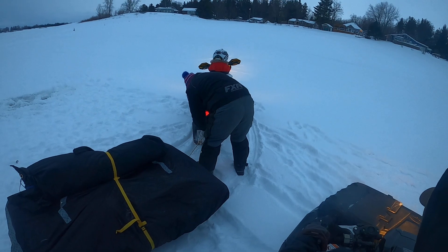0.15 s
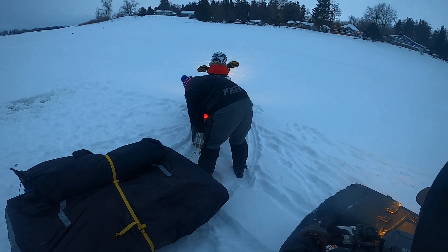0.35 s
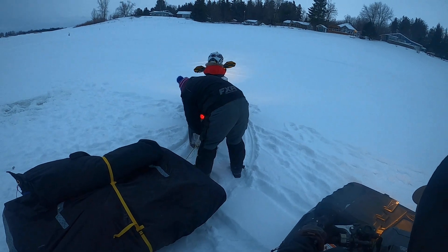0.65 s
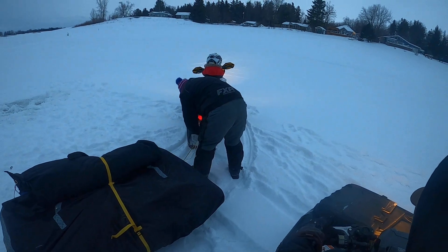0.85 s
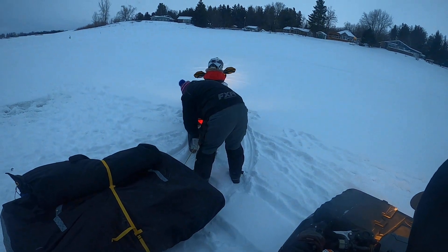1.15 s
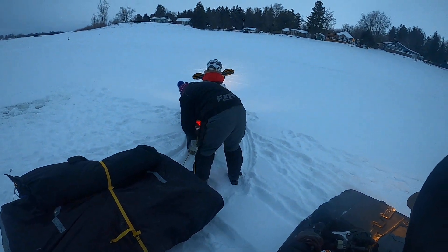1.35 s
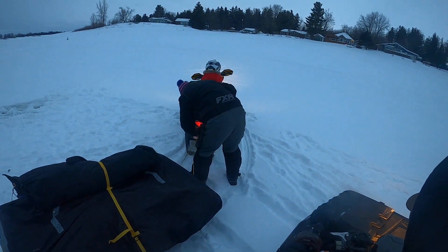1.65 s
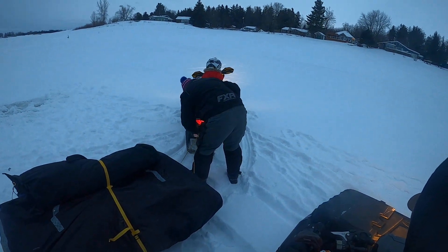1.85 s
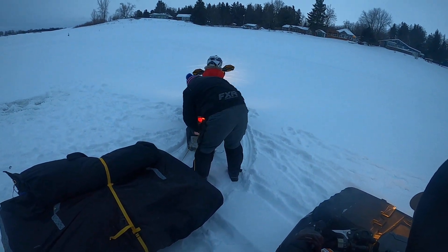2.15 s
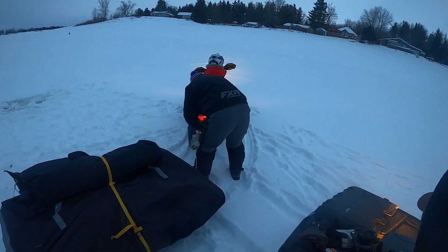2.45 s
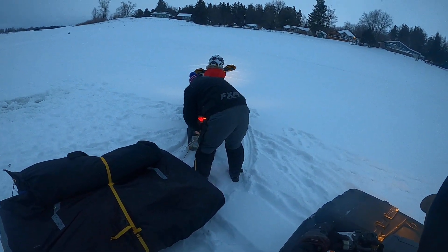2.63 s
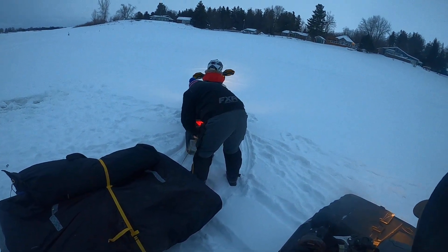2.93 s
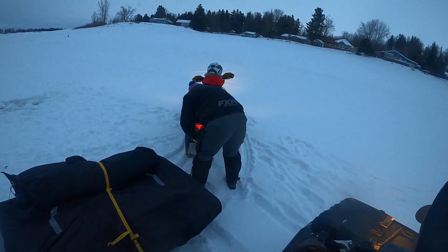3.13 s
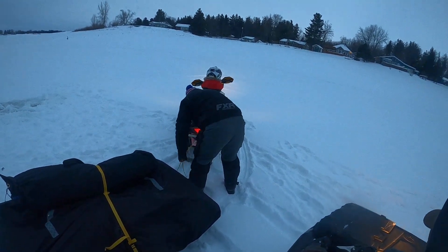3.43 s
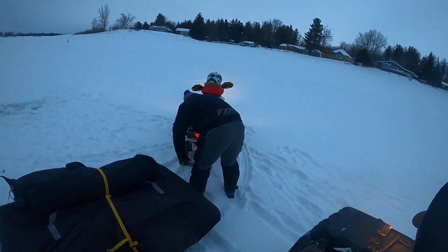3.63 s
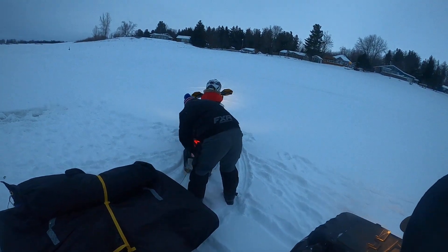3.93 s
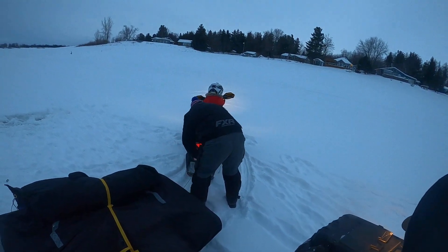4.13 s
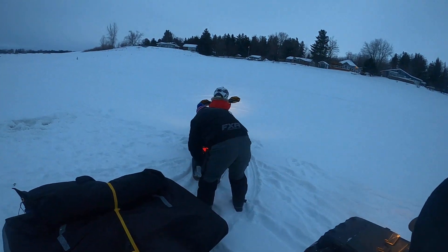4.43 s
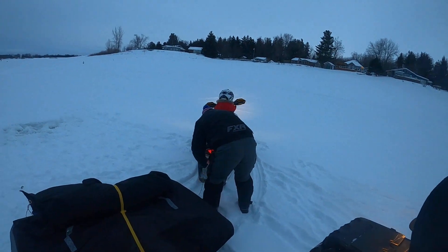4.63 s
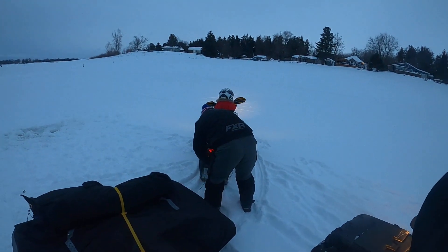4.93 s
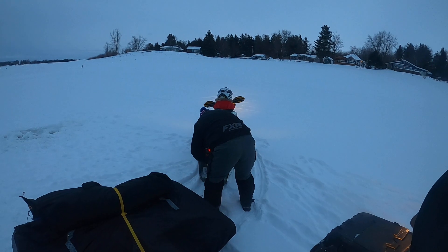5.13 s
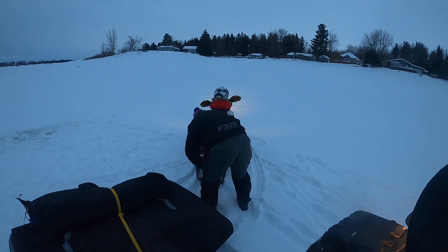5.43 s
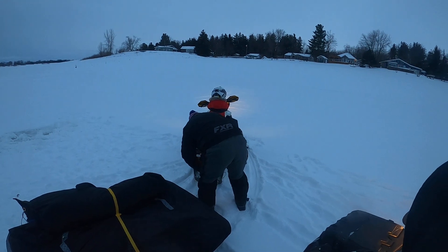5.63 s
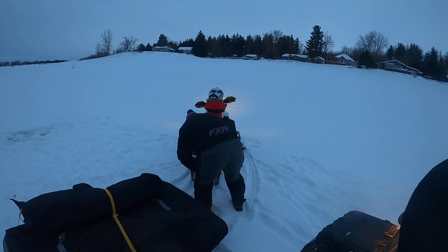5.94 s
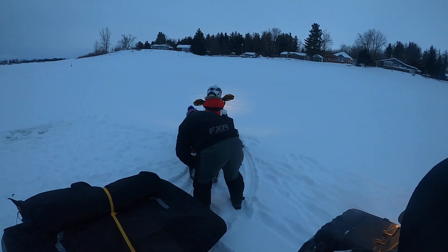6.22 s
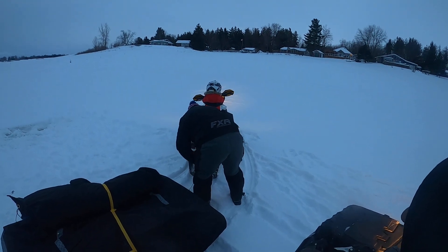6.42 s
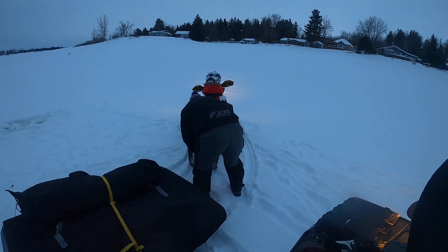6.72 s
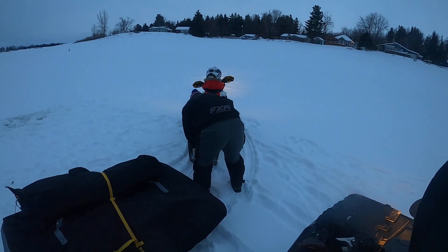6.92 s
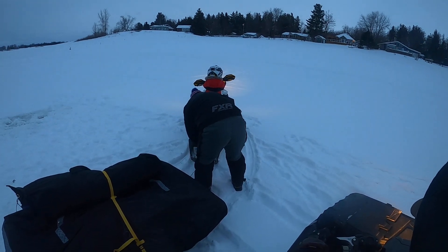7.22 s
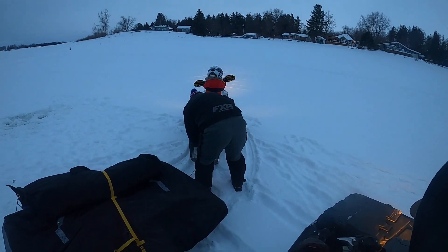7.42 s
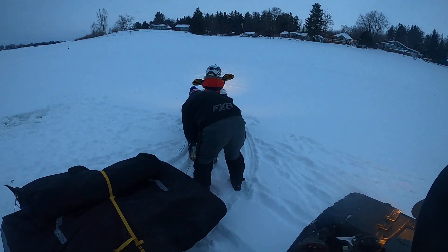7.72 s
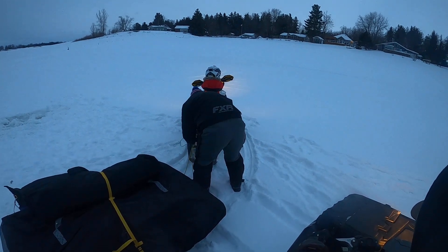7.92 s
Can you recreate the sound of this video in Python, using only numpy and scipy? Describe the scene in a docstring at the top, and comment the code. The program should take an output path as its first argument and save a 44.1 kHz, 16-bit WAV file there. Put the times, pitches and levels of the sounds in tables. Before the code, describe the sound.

A lumpy snowmobile engine chugs steadily outdoors, dry and without echo. For nearly three seconds, plastic buzz and irregular clatter sit right, with bright mechanical whirr left. Scraping and sharp knocks follow around 2.8 and 3.35 seconds, each with a low dying thump. Afterwards the rattle mostly disappears, leaving thuds, soft gas puffs and valve chatter; drone and faint buzz grow late. The microphone is close, on the seat.

```python
"""Open snow, no walls, no echo: a four-stroke twin snowmobile idles, heard from the seat.
Filtered impulses make two uneven exhaust thuds a cycle; noise puffs make gas, panels and ticking valves.
Gears whirr as coloured noise. A loose camera mount buzzes and clacks (resonated impacts) at the right port,
scrapes into two groups of knocks (ringing modes), then seats, bringing the sound to the middle.
Later it creeps a little loose again."""
import sys
import numpy as np
from scipy import signal
from scipy.fft import rfft, irfft
from scipy.io import wavfile
from scipy.ndimage import uniform_filter1d

SR = 44100
rng = np.random.default_rng(int(sys.argv[2]) if len(sys.argv) > 2 else 0)


def dump_mix(stems):
    """Bounce the given channels to the path in sys.argv[1] as a 16-bit WAV at rate SR."""
    frames = np.atleast_2d(stems).T  # one column per channel
    limited = np.clip(frames, -1, 1)  # hard clip at full scale
    pcm = np.round(limited * 32767).astype(np.int16)
    wavfile.write(sys.argv[1], SR, pcm)


N = 355887

CYCLE_HZ, FIRST_FIRING_S = 10.34, .029


def undb(db):
    """Decibels to gain."""
    return 10 ** (np.asarray(db) / 20)


def unit(x):
    """Scale to rms 1."""
    return x / np.sqrt(np.mean(x ** 2))


def ports(left_db):
    """Left and right gains, with the right at 1."""
    return undb(np.array([[left_db], [0]]))


def ramp(start_s, length_s):
    """Even rise from 0 to 1."""
    return np.clip((np.arange(N) / SR - start_s) / length_s, 0, 1)


def arch(middle_s, length_s):
    """Smooth rise from 0 to 1 and back."""
    return np.sin(np.pi * ramp(middle_s - length_s / 2, length_s)) ** 2


def swells(rows):
    """Gain that rests at 1 and rises or dips for each swell."""
    return undb(sum(db * arch(s, length) for s, length, db in rows))


def walk(rate):
    """Smooth random wander, rms 1, with a new target at the given rate in Hz."""
    k = int(SR / rate)
    targets = rng.standard_normal(N // k + 1)
    return unit(uniform_filter1d(np.repeat(targets, k), k)[:N])


def add(out, s, sound):
    """Mix a sound in at a time in seconds."""
    at = int(s * SR)
    out[:, at:at + sound.shape[-1]] += sound[..., :N - at]


def colour(x, points):
    """Causal minimum-phase filter through (f/Hz, level/dB) points, falling off beyond both ends."""
    hz, db = np.transpose(points)
    size = 16384
    log_f = np.log(np.maximum(np.arange(size // 2 + 1) * SR / size, 1))
    skirts = np.maximum(log_f - np.log(hz[-1]), 0) + np.maximum(np.log(hz[0]) - log_f, 0)
    log_gain = np.log(undb(np.interp(log_f, np.log(hz), db))) - 2 * skirts
    # folding the cepstrum onto positive time makes the filter causal
    cepstrum = irfft(log_gain)
    cepstrum[1:size // 2] *= 2
    cepstrum[size // 2 + 1:] = 0
    response = irfft(np.exp(rfft(cepstrum)))
    return signal.fftconvolve(x, response)[:len(x)]


def resonate(x, hz, width):
    """Steep resonance whose centre may move: shift to 0 Hz, low-pass in two stages, shift back."""
    turn = np.exp(2j * np.pi * np.cumsum(hz * np.ones(N)) / SR)
    pole = np.exp(-2 * np.pi * width / SR)
    smoothed = signal.lfilter([(1 - pole) ** 2], np.poly([pole, pole]), x * turn.conj())
    return 2 * np.real(turn * smoothed)


def strokes(parts, scatter_db, jitter_s):
    """One impulse per part and engine cycle, each a little different in time and strength."""
    out, cycles = np.zeros(N), np.arange(-1, N / SR * CYCLE_HZ)
    for place, db in parts:
        chance = rng.standard_normal((len(cycles), 2))
        times = FIRST_FIRING_S + (cycles + place) / CYCLE_HZ + jitter_s * chance[:, 0]
        at = (times * SR).astype(int)
        inside = (at >= 0) & (at < N)
        out[at[inside]] += undb(db + scatter_db * chance[inside, 1])
    return out


def bursts(hits, decay_s):
    """Each impulse sets off a dying puff of noise."""
    envelope = signal.lfilter([1], [1, -np.exp(-1 / (decay_s * SR))], hits)
    return unit(envelope * rng.standard_normal(N))


def rattle(rate, spread_db):
    """Dense random impacts of different sizes, rate per second."""
    size = undb(spread_db * rng.uniform(-0.4, 1, N)) * rng.choice([-1, 1], N)
    return unit((rng.random(N) < rate / SR) * size)


def snap(spectrum, decay_s):
    """A very short burst of contact noise, peak 1."""
    t = np.arange(SR // 2) / SR
    burst = colour(rng.standard_normal(len(t)) * np.exp(-t / decay_s), spectrum)
    return burst / np.abs(burst).max()


# valves closing: place in the cycle [0-1], level/dB
VALVE_CLOSINGS = [(.24, -1), (.42, -1.5), (.64, 1.5), (.79, 1.5)]


def valve_strokes():
    """Valves meet their seats in each cycle, slightly unevenly."""
    return strokes(VALVE_CLOSINGS, scatter_db=1.5, jitter_s=.001)


def machinery(valves, valve_db, chain_db):
    """Valve taps and chain chatter over the even whirr of the gears."""
    taps = undb(valve_db) * bursts(valves, decay_s=0.005)
    chain = undb(chain_db) * rattle(rate=670, spread_db=9.0)
    gears = rng.standard_normal(N) * undb(.7 * walk(14))
    return unit(taps + chain + gears)


# thin airy hiss: f/Hz, level/dB
AIR_SPECTRUM = [(300, 9), (600, 1.5), (1100, -1.5), (1600, 3), (2100, -17), (2700, -10.5), (3130, 5),
                (3330, -9.5), (3900, -9.5), (5100, -18), (5900, -19), (7300, -24.5), (8600, -43.5)]
# its swells: middle t/s, length t/s, rise level/dB
HISS_RISES = [(3.45, 0.3, 11), (4.75, 1.1, 8), (7.6, 4.5, 14)]


def hiss(valves):
    """Machinery noise thinned to air, swelling now and then."""
    air = unit(colour(machinery(valves, valve_db=-3.5, chain_db=-11.5), AIR_SPECTRUM))
    return undb(-70) * swells(HISS_RISES) * air


# gas spitting from the pipe: f/Hz, level/dB
GAS_SPECTRUM = [(2500, -4), (4000, 2.5), (5500, -4.5), (7500, -8.5), (9000, -11.5), (13000, -18.5)]


def spit(firings, swell_s):
    """A soft puff of gas swells and dies with each firing."""
    t = np.arange(SR // 10) / SR
    puffs = signal.fftconvolve(firings, t * np.exp(-t / swell_s))[:N]
    return undb(-84.5) * unit(colour(puffs * rng.standard_normal(N), GAS_SPECTRUM))


# the clutch's chinks: place in the cycle [0-1], level/dB
CLUTCH_CHINKS = [(.62, -1), (.8, -1), (.22, -3)]


def clutch():
    """Slack in the clutch chinks with the crank's jerks, now faint, now clear."""
    chinks = bursts(strokes(CLUTCH_CHINKS, scatter_db=2.2, jitter_s=.003), decay_s=.009)
    ring = resonate(chinks, 1560 * (1 + .04 * walk(15)), width=190)
    return undb(-63) * unit(ring)


# the hood's two modes: f/Hz, width f/Hz, level/dB
HOOD_MODES = [(328.5, 21, 1), (348.4, 14, -0.5)]
# swells of the drone: middle t/s, length t/s, rise level/dB
DRONE_RISES = [(5.55, 0.52, 2.5), (6.9, 1, 3.5), (7.7, 0.94, 7.5)]


def hood(firings):
    """The hood drones in two close, wandering modes, driven by noise and by the firings."""
    drive = unit(firings) + undb(13.0) * rng.standard_normal(N)
    drone = 0
    for hz, width, db in HOOD_MODES:
        drone = drone + undb(db) * resonate(drive, hz * (1 + 0.0059 * walk(3)), width)
    return undb(-50) * swells(DRONE_RISES) * unit(drone)


# engine block and gears: f/Hz, level/dB
BLOCK_SPECTRUM = [(250, -4.5), (450, -1.5), (620, -2), (880, -7), (1050, -3), (1170, -7.5), (1380, 0),
                  (1600, 0.5), (1800, -2.5), (2070, -14), (2320, -11), (2500, -13.5), (2800, -9),
                  (3100, -15.5), (3400, -19), (5000, -45)]


def engine_block(valves):
    """Valves, chain and gears sound through the resonant block."""
    works = machinery(valves, valve_db=-11.0, chain_db=-4.5)
    return undb(-56) * unit(colour(works, BLOCK_SPECTRUM))


# rubbing fabric: f/Hz, level/dB
CLOTH_SPECTRUM = [(300, -5.5), (800, 15), (1050, 2.5), (1350, 2.5), (1900, -9), (2500, -11), (3400, -28),
                  (4200, -36.5), (5000, -31.5), (6000, -58.5), (8000, -57)]
# clothing brushing the camera: middle t/s, length t/s, level/dB, left minus right level/dB
BRUSH_STROKES = [(2.76, 0.073, -46, -21), (2.934, 0.36, -51, -18.5), (3.222, 0.16, -47.5, 1.5)]


def brush():
    """Stiff fabric catches and slips on the camera: uneven grains under a few arched strokes."""
    grains = rattle(rate=1200, spread_db=6) * undb(2 * walk(60))
    pressure = 0
    for s, length, db, pan_db in BRUSH_STROKES:
        sides = undb(db + np.array([[pan_db], [-pan_db]]) / 2)
        pressure = pressure + arch(s, length) * sides
    return pressure * unit(colour(grains, CLOTH_SPECTRUM))


def mount_play(settle_power, creep_power):
    """How loose the mount is (near 1 = loose): free, then seated, then slowly working loose again."""
    seated_play, creep_play = 0.014, 0.19
    settling = (1 - ramp(2.776, length_s=1)) ** settle_power
    creep = ramp(5.2, length_s=3.17) ** creep_power
    return seated_play + settling + creep_play * creep


# bright side of the whirr, at the left port: f/Hz, level/dB
BRIGHT_SPECTRUM = [(400, -10), (1000, -6.5), (1330, -4.5), (1500, 8), (1610, -10.5), (1730, 2.5),
                   (2070, -14), (2350, 0), (2600, -8.5), (3120, -1.5), (3290, -13), (3800, -12),
                   (4600, -23), (7400, -24.5), (8600, -42.5)]


def bright_whirr(valves):
    """Machinery noise with the bright colour of the left port; level at a play of 1."""
    works = machinery(valves, valve_db=-4.0, chain_db=-4.5)
    return undb(-51.5) * unit(colour(works, BRIGHT_SPECTRUM))


def housing(valves, resonances, impact_db, drift):
    """Engine vibration chatters through the loose mount and excites drifting resonances."""
    impacts = undb(impact_db) * rattle(rate=300, spread_db=3.0)
    chatter = impacts + machinery(valves, valve_db=-9.0, chain_db=-18.0)
    ring = 0
    for hz, width, db in resonances:
        ring = ring + undb(db) * resonate(chatter, hz * (1 + drift * walk(4)), width)
    return unit(ring)


# resonances of the steadier rattle in its shell: f/Hz, width f/Hz, level/dB
SHELL_MODES = [(137, 22.5, 12.5), (154, 29, 11), (343.2, 7, 16), (774, 83, -4), (950, 16, -6.5),
               (1032, 59, 2.5), (1155, 160, -7)]


def shell_rattle(valves):
    """The shell rattles more steadily than the housing buzzes; level at a play of 1."""
    return undb(-36) * housing(valves, SHELL_MODES, impact_db=-2.0, drift=0.0065)


# one clack of the housing: f/Hz, level/dB
CLACK_SPECTRUM = [(300, -22), (450, -6), (550, 0), (680, -2), (820, -20), (1050, -22), (1600, -38),
                  (3000, -58)]
# the housing's bounces on the mount: place in the cycle [0-1], level/dB
HOUSING_BOUNCES = [(0, 1), (.17, -1.5), (.43, 0.5), (.83, -3)]


def clatter():
    """The loose housing bounces against the mount in step with the engine, very unevenly."""
    bounces = strokes(HOUSING_BOUNCES, scatter_db=4, jitter_s=.003)
    return undb(-51) * unit(colour(bursts(bounces, decay_s=0.0022), CLACK_SPECTRUM))


# low resonances of the buzzing camera housing: f/Hz, width f/Hz, level/dB
HOUSING_MODES = [(234, 20, -6.5), (463.3, 35, 7.5), (534.7, 29, 9), (621.5, 23, 7), (644.5, 31, -0.5),
                 (730, 42, -9.5)]
# surges and dips of the buzz: middle t/s, length t/s, rise level/dB
BUZZ_SURGES = [(.33, 0.34, 3.5), (.54, 0.71, 2), (1.09, 0.43, 4), (1.56, 0.41, -6), (1.85, 0.12, 4),
               (2.33, 0.72, 2), (2.53, 0.15, 4.5), (2.785, 0.11, 14.5), (3.05, 0.57, 5.5), (7.85, 2.7, 3.5)]


def housing_buzz(valves):
    """Buzz and clatter surge together; the pitches wander as the housing shifts in the mount."""
    buzz = undb(-38) * housing(valves, HOUSING_MODES, impact_db=1.5, drift=.015)
    return swells(BUZZ_SURGES) * (buzz + clatter())


# the hardest rattles of the housing: start t/s, length t/s, level/dB at a play of 1
CLACK_RUNS = [(.293, .025, -29), (.355, .025, -33), (.432, .018, -34), (.985, .03, -31), (1.08, .018, -29),
              (1.168, .018, -30), (1.361, .04, -39), (1.94, .062, -33), (2.114, .01, -33),
              (2.19, .018, -32), (2.275, .02, -30), (2.356, .028, -30), (2.41, .02, -36), (2.9, .014, -33),
              (2.922, .03, -32), (3.002, .02, -34), (7.882, .012, -32)]


def clacks(attack_s, release_s):
    """Now and then the housing breaks into a short, harder rattle of shaped noise."""
    out, t = np.zeros((1, N)), np.arange(SR // 5) / SR
    for s, length_s, db in CLACK_RUNS:
        envelope = np.minimum(t / attack_s, 1) * np.exp(-np.maximum(t - length_s, 0) / release_s)
        run = colour(envelope * rng.standard_normal(len(t)), CLACK_SPECTRUM)
        # the run's whole energy is set by its level and length
        add(out, s, undb(db) * run * np.sqrt(length_s * SR / np.sum(run ** 2)))
    return out[0]


# buzz and rattle leaking to the left port: f/Hz, level/dB
LEAK_SPECTRUM = [(130, -15.5), (250, -9), (345, -8), (450, -23.5), (650, -35), (1020, -23.5), (1400, -16)]
# the bright whirr at the right port, relative to the left: f/Hz, level/dB
RIGHT_SPECTRUM = [(900, -13.5), (1300, -4), (1520, 4), (1750, -3), (2330, -4), (2800, -9.5), (3700, -6.5),
                  (5500, -9.5)]


def cross_ports(bright, loose):
    """Brightness sits left and buzz right; each is filtered on its way to the other port."""
    left = bright + colour(loose, LEAK_SPECTRUM)
    # the whirr reaches the right port 0.1 ms earlier
    lead = int(.0001 * SR)
    right = loose + np.roll(colour(bright, RIGHT_SPECTRUM), -lead)
    return np.array([left, right])


# plastic sliding on plastic: f/Hz, level/dB
SCRAPE_SPECTRUM = [(700, -10), (1100, -18), (1400, 8), (1750, -4), (2050, -13), (2300, -2.5), (2750, -17.5),
                   (3300, -16.5), (4100, -33.5), (5300, -27), (7000, -51)]
# scrapes into a knock: end t/s, length t/s, judder f/Hz, judder level/dB, its left minus right level/dB,
# grit level/dB, its left minus right level/dB
MOUNT_SCRAPES = [(2.789, 0.043, 693, -25.5, -26, -40.5, 2), (3.352, .028, 410, -22.5, 1.5, -38.5, 4)]


def scrapes(waver, release_s):
    """The mount judders (a wavering tone) and grates (dense impacts), ever louder, into a knock."""
    grit = unit(colour(rattle(rate=2500, spread_db=4.5), SCRAPE_SPECTRUM))
    out = np.zeros((2, N))
    for end_s, length_s, hz, judder_db, judder_left_db, grit_db, grit_left_db in MOUNT_SCRAPES:
        pressure = ramp(end_s - length_s, length_s) * (1 - ramp(end_s - release_s, release_s))
        judder = unit(np.sin(2 * np.pi * np.cumsum(hz * (1 + waver * walk(300))) / SR))
        out += pressure * undb(judder_db) * ports(judder_left_db) * judder
        out += pressure * undb(grit_db) * ports(grit_left_db) * grit
    return out


# modes of the camera mount: f/Hz, level/dB, t60 t/s, left minus right level/dB
MOUNT_MODES = [(340, 2.4, .063, 4), (416, -8.8, .063, -9), (457, -1.6, .054, -17), (541, -14.9, .057, -20),
               (646, -8.3, .086, -22), (782, -13.6, .03, -14), (1028, -12.7, .024, -13),
               (1343, -11.8, .018, -1), (1768, -15.1, .02, 5), (2300, -11.6, .024, 2)]
# knocks on the mount: t/s, ring level/dB, centre f/Hz, width [octaves], contact t/s,
# crack level/dB, left minus right ring level/dB
MOUNT_KNOCKS = [(2.7415, -9.5, 618, .4, .0007, -53, -2), (2.7727, -8.5, 819, .84, .0007, -38, -2),
                (2.7779, -8.1, 677, .89, .0005, -36, -3), (2.7807, -2.6, 1183, .65, .0005, -25, -4),
                (2.7913, -12.9, 480, .49, .0011, -60, -8), (3.048, -28, 1400, .7, .0003, -29, -5),
                (3.3493, -8.5, 1233, .84, .0003, -15, -1), (3.3518, -7.2, 410, .87, .0018, -50, -3),
                (3.4019, -18.5, 411, 1.6, .0007, -55, -2)]
# sharp plastic contact: f/Hz, level/dB
CRACK_SPECTRUM = [(400, 16.5), (1000, -12), (1350, 12.5), (1850, 5), (2130, -11), (2320, -4.5), (2550, 2),
                  (3400, -10.5), (4100, -33.5), (4800, -13.5), (5900, -33.5), (7500, -34.5), (8600, -44.5)]
# one small high tick: f/Hz, level/dB
TICK_SPECTRUM = [(3000, -14), (5000, -10), (6600, -4), (8500, -8), (10500, -24)]


def knocks(contact_hz, crack_left_db):
    """Each blow builds up over its contact time, rings the mount and cracks; a tick comes later."""
    rings, cracks, lead_s = np.zeros((2, N)), np.zeros((2, N)), .01
    t = np.arange(SR // 2) / SR - lead_s
    for s, ring_db, centre_hz, width, contact_s, crack_db, left_db in MOUNT_KNOCKS:
        push = (1 + np.tanh(t / contact_s)) / 2
        for hz, db, t60, mode_left_db in MOUNT_MODES:
            # modes far from the blow's centre ring less: 15 dB down at one width
            miss = np.log2(hz / centre_hz) / width
            blow = undb(ring_db + db - 15 * miss ** 2) * ports(left_db + mode_left_db)
            decay = np.exp(-np.log(1000) * np.maximum(t, 0) / t60)
            add(rings, s - lead_s, blow * push * np.sin(2 * np.pi * hz * t) * decay)
        add(cracks, s, undb(crack_db) * ports(crack_left_db) * snap(CRACK_SPECTRUM, decay_s=.0018))
    add(cracks, 7.408, undb(-45) * snap(TICK_SPECTRUM, decay_s=0.00056))
    # the soft contact drives the mount's highest notes only weakly
    soft_contact = signal.butter(4, contact_hz, fs=SR, output="sos")
    return cracks + signal.sosfilt(soft_contact, rings)


# the camera's sways: t/s, level/dB, t60 t/s
CAMERA_SWAYS = [(2.7801, -9, 0.37), (3.3566, -11, 0.38)]
# modes of the sway: f/Hz, level/dB
SWAY_MODES = [(91.3, 0), (147, -12)]


def sway(rise_s):
    """The whole camera sways on its mount after the main knocks: low dying modes, alike at both ports."""
    out, t = np.zeros((1, N)), np.arange(SR // 2) / SR
    modes = sum(undb(db) * np.sin(2 * np.pi * hz * t) for hz, db in SWAY_MODES)
    for s, db, t60 in CAMERA_SWAYS:
        rise = 1 - np.exp(-(t / rise_s) ** 2)
        add(out, s, undb(db) * rise * np.exp(-np.log(1000) * t / t60) * modes)
    return out


# the chug's dip and late growth: middle t/s, length t/s, rise level/dB
CHUG_RISES = [(3.13, 0.97, -2), (7.5, 2.5, 1.2)]


def chug_level():
    """Gain shared by exhaust and panels: it dips around the later knocks and grows a little near the end."""
    return swells(CHUG_RISES)


# shaking body panels: f/Hz, level/dB
PANEL_SPECTRUM = [(15, -7), (40, -15.5), (65, -7.5), (85, -3), (135, 4), (155, -5), (180, -8.5), (205, -17),
                  (240, -14), (275, -19), (370, -19.5), (420, -40.5), (700, -50.5)]


def panels(firings):
    """Every firing shakes the panels, which never quite come to rest."""
    shake = bursts(firings, decay_s=0.04) + undb(1) * rng.standard_normal(N)
    return undb(-34.5) * unit(colour(shake, PANEL_SPECTRUM))


# the two cylinders: place in the cycle [0-1], level/dB
CYLINDER_FIRINGS = [(0, 0), (.628, -2)]


def firing_strokes():
    """The two cylinders fire at uneven spacing, with slight scatter."""
    return strokes(CYLINDER_FIRINGS, scatter_db=.6, jitter_s=.0003)


# one exhaust thud after the silencer: f/Hz, level/dB
SILENCER_SPECTRUM = [(18, -30.5), (31, -9.5), (50, 0), (70, -6.5), (88, 2.5), (118, -5.5), (145, -25.5),
                     (185, -25), (250, -38.5), (320, -43.5), (700, -62)]


def exhaust(firings):
    """Each firing impulse leaves the silencer as a low thud, with polarity inverted."""
    return -undb(-28.5) * unit(colour(firings, SILENCER_SPECTRUM))


def scene():
    """The engine in the middle; the play of the mount brings brightness on the left and buzz on the right."""
    firings, valves = firing_strokes(), valve_strokes()
    play = mount_play(settle_power=1.77, creep_power=2.3)
    # a loose mount passes on less of these: -8 dB at a play of 1
    passed_on = undb(-8 * play)
    fine = hiss(valves) + spit(firings, swell_s=.006) + clutch() + engine_block(valves)
    loose = housing_buzz(valves) + clacks(attack_s=0.0015, release_s=0.0044) + shell_rattle(valves)
    mount = play * cross_ports(bright_whirr(valves), loose)
    handling = brush() + scrapes(waver=0.0843, release_s=0.0018)
    handling = handling + knocks(contact_hz=3200, crack_left_db=-3.5) + sway(rise_s=0.0012)
    chug = chug_level() * (panels(firings) + exhaust(firings))
    return passed_on * fine + hood(firings) + mount + handling + chug


def record(dry):
    """The camera cuts the top steeply above 15.6 kHz."""
    return signal.sosfilt(signal.ellip(8, .2, 70, 15600, fs=SR, output="sos"), dry)


dry = scene()
out = record(dry)
dump_mix(out)
```